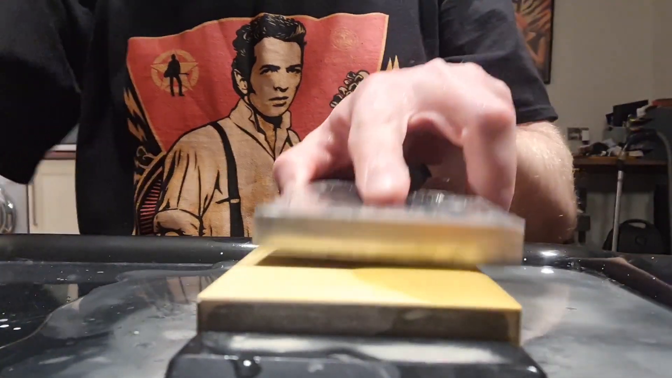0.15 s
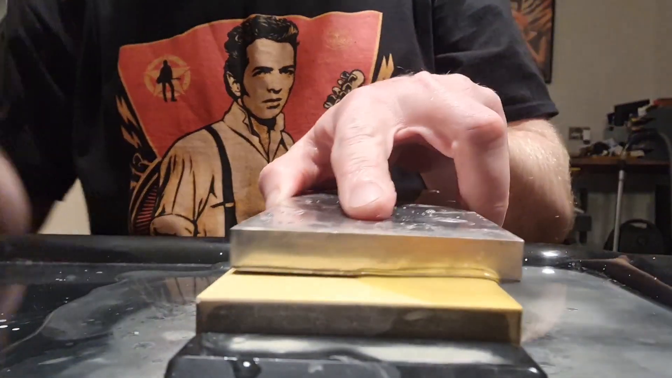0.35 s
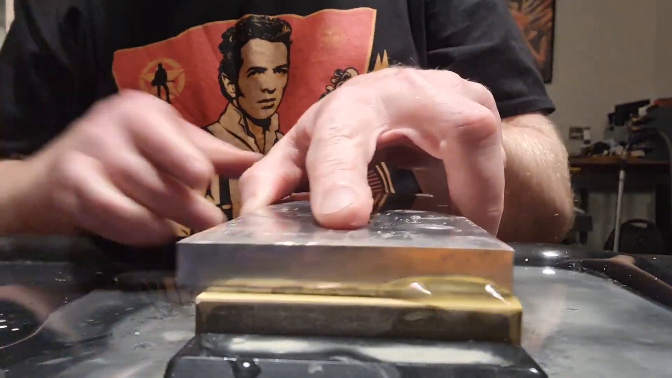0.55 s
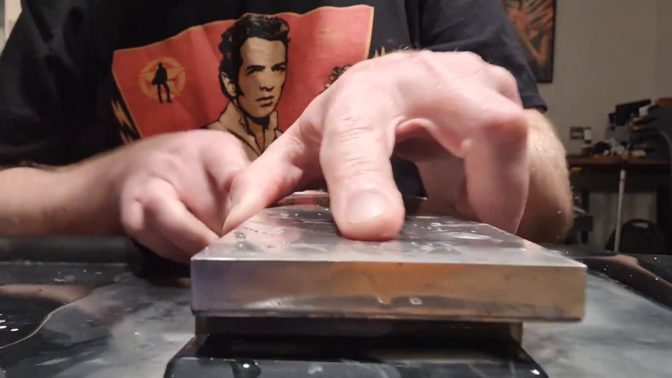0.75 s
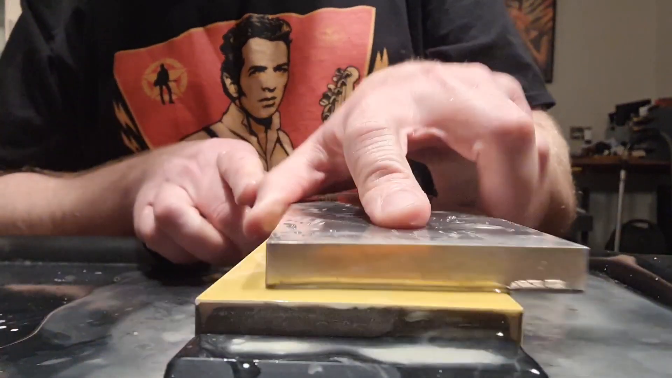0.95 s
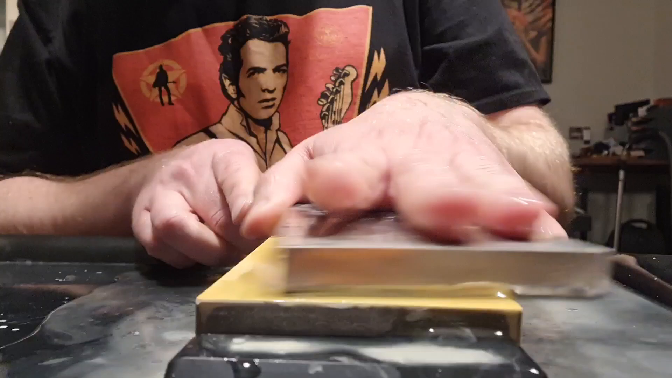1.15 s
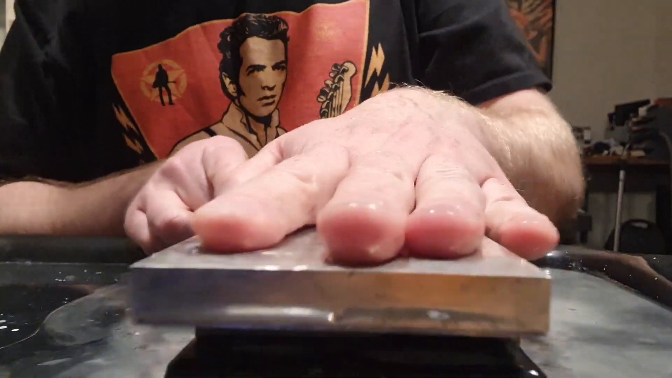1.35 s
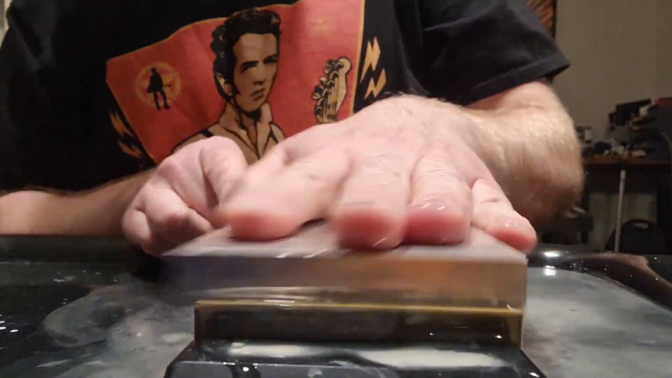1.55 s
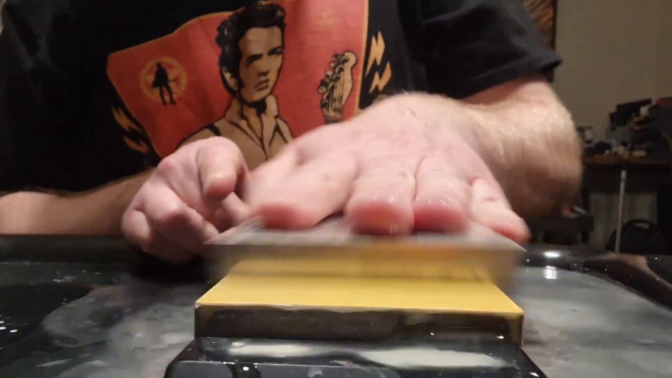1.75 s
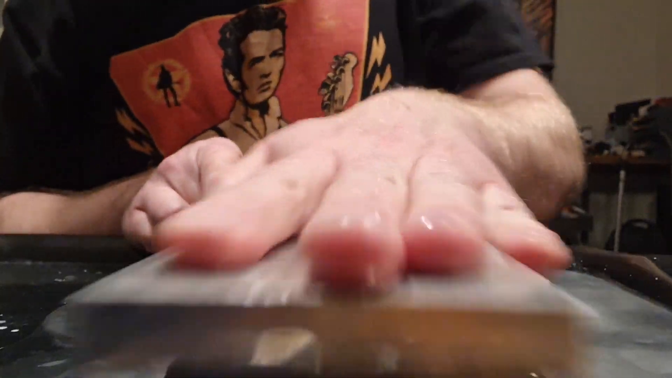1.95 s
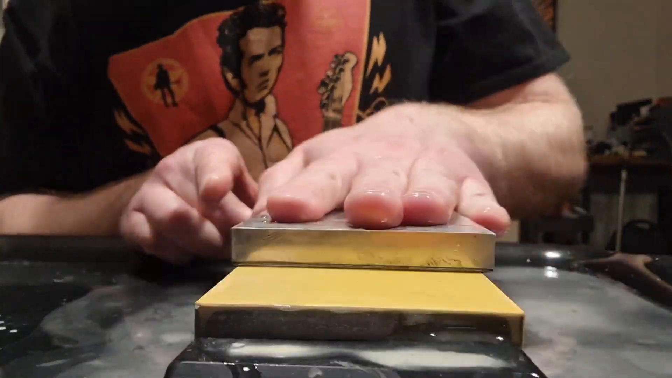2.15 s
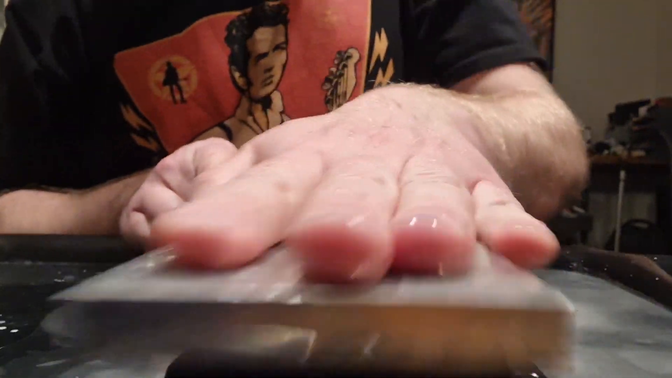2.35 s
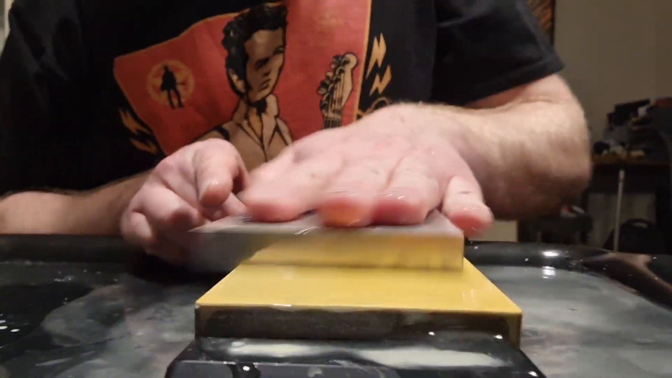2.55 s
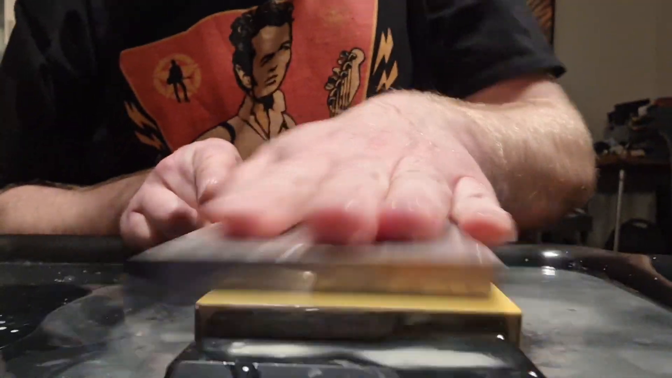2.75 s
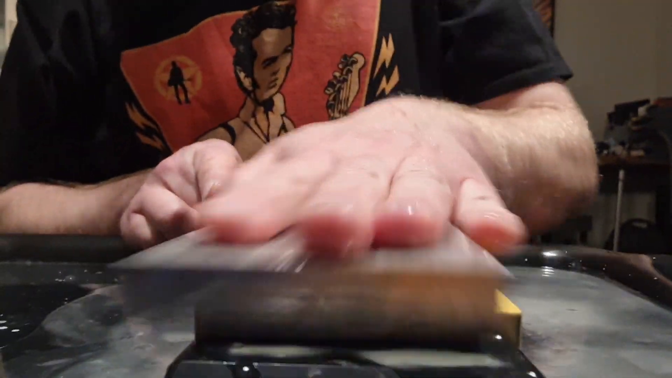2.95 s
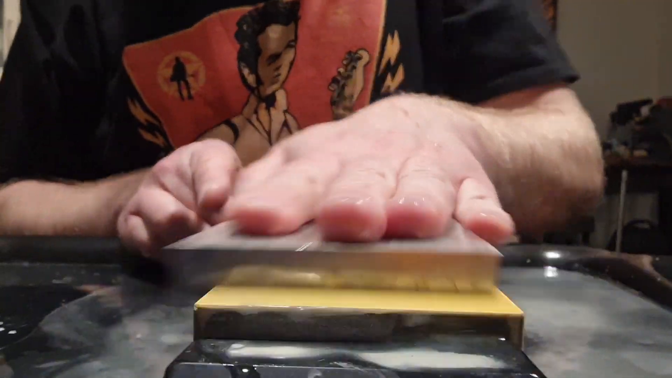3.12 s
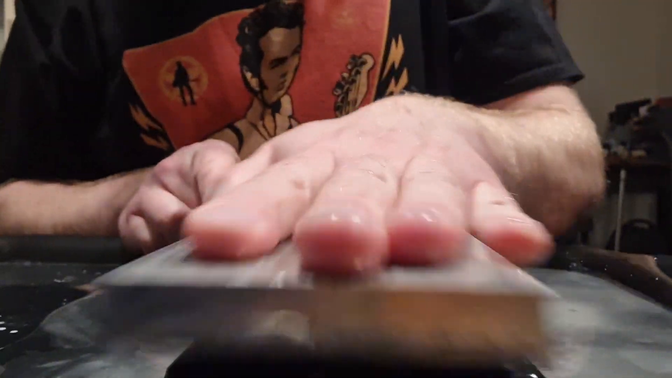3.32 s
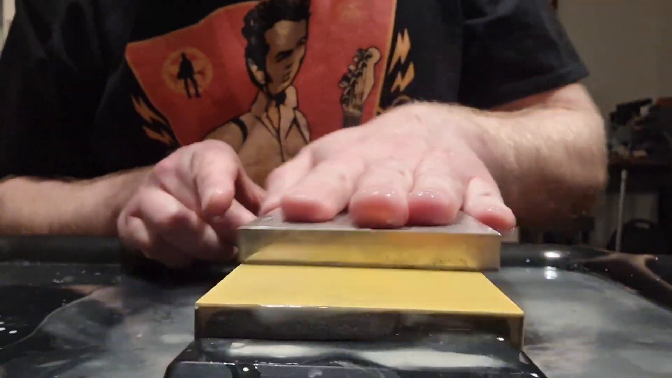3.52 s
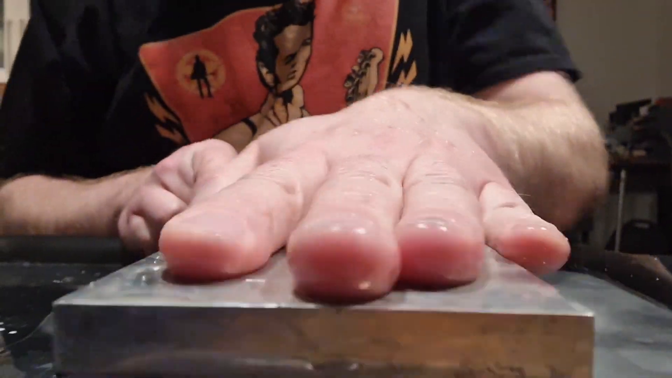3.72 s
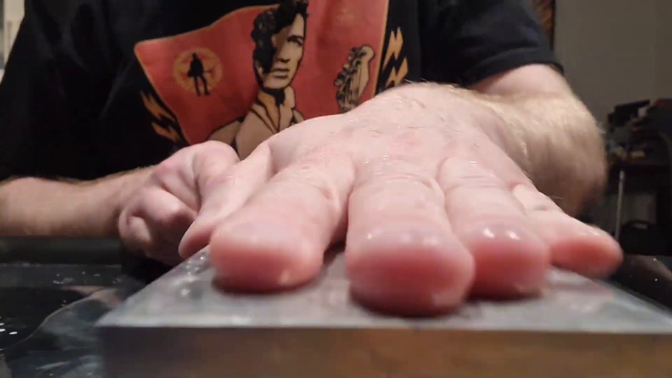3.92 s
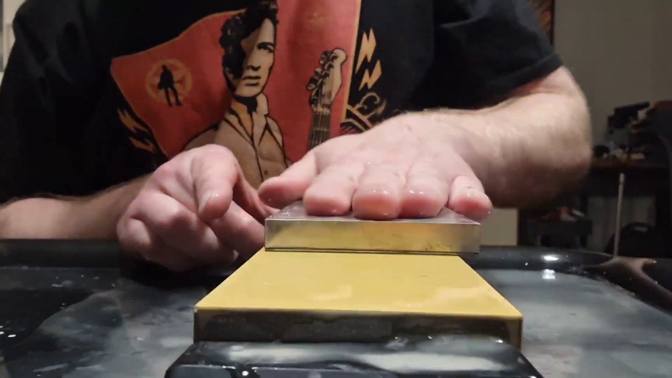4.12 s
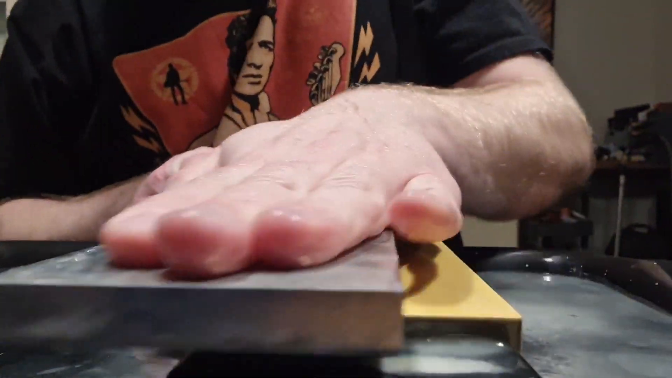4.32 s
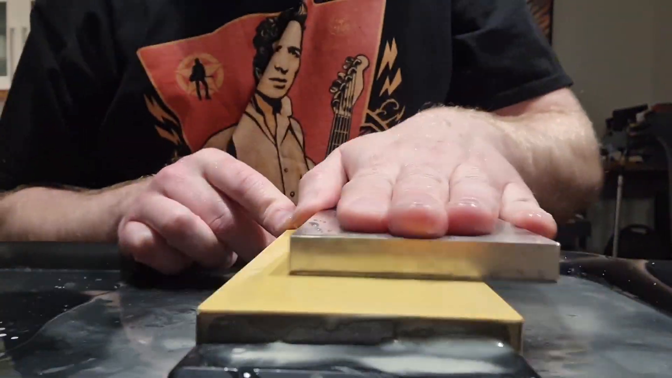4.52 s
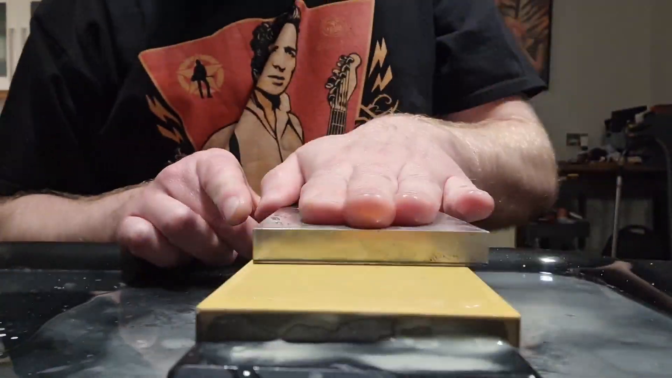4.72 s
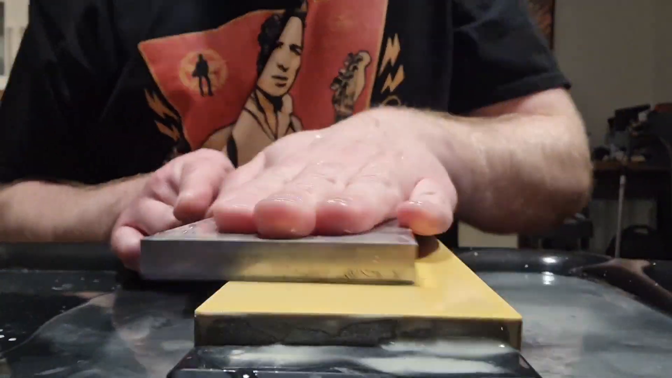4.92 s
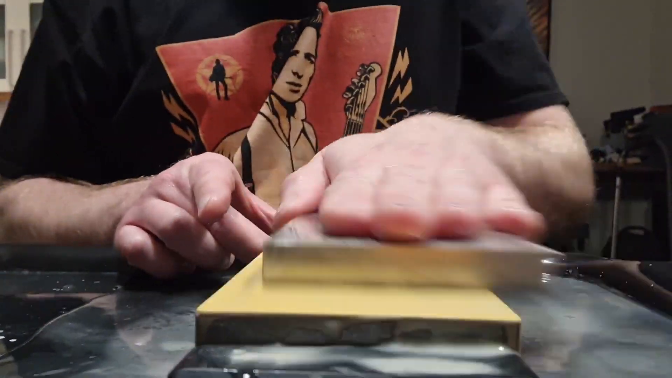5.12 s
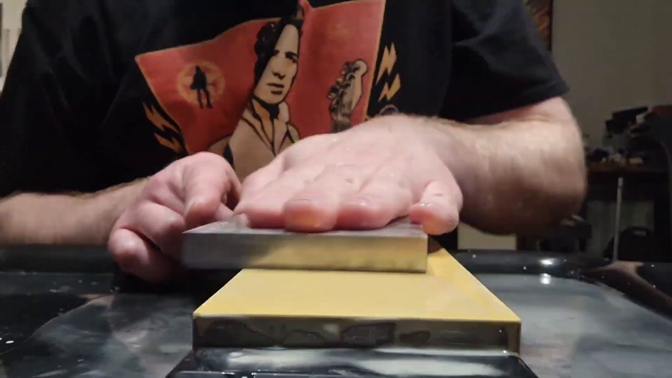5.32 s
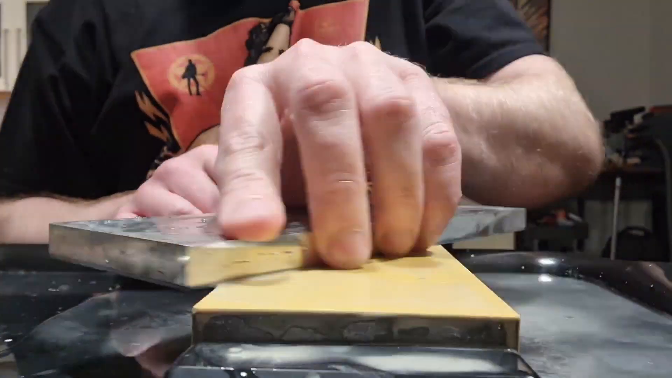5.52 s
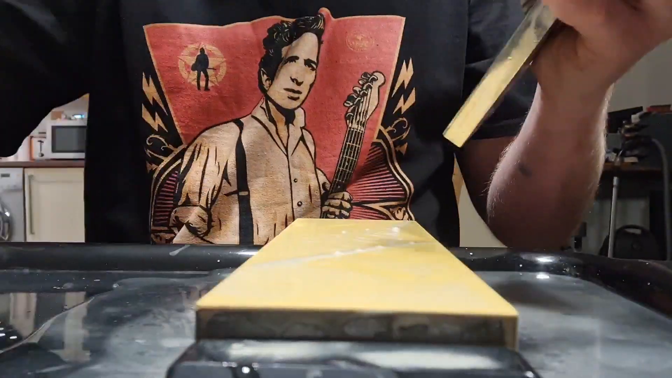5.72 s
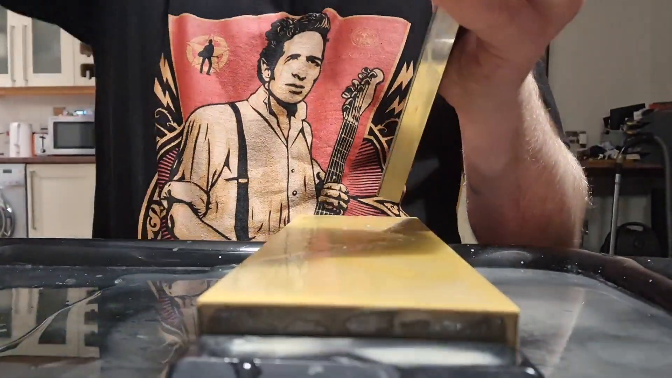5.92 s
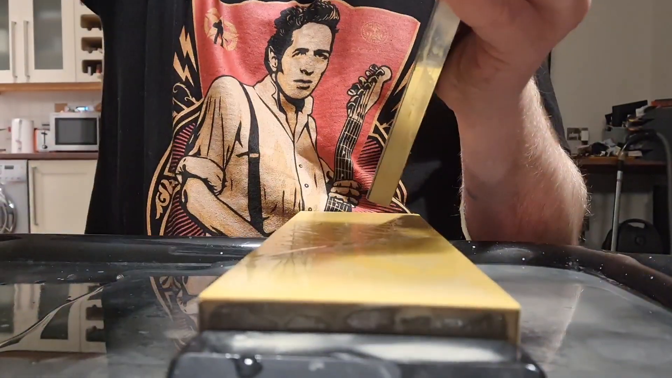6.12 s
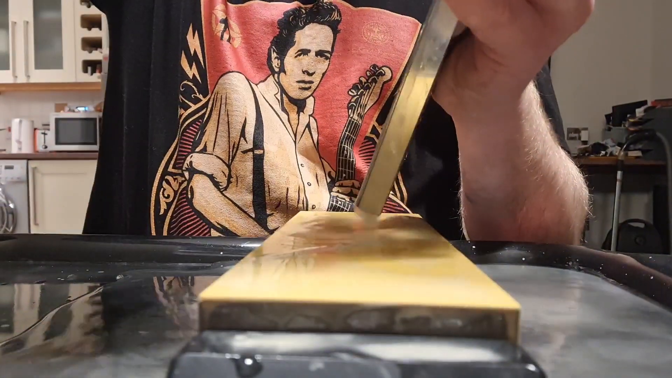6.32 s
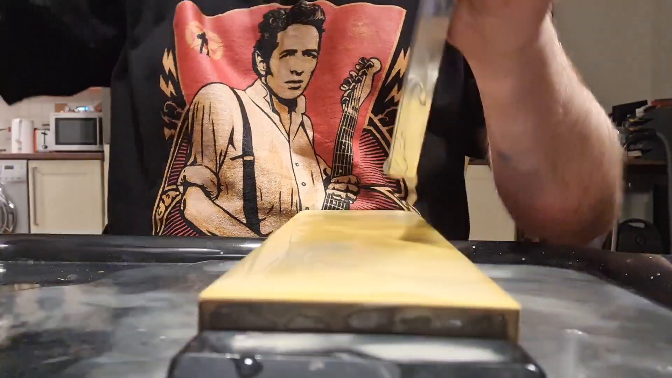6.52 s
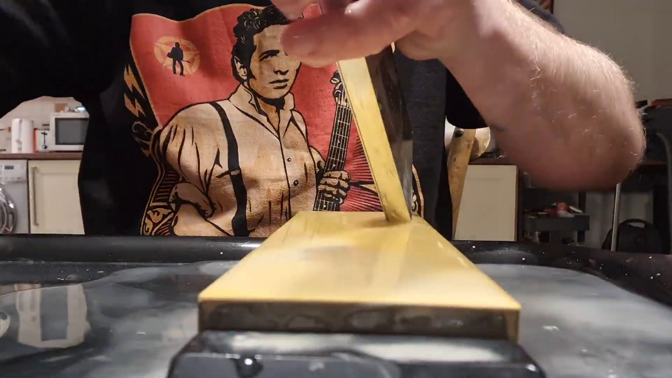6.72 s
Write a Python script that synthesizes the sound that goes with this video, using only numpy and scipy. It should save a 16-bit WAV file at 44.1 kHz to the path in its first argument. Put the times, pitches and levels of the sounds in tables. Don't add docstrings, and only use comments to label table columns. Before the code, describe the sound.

Gritty metal-on-wet-stone strokes build and quicken after a short knock, then stop abruptly, leaving small bumps, watery ticks and quiet hum.

```python
import sys
import numpy as np
from scipy import signal
from scipy.fft import rfft, irfft, next_fast_len
from scipy.io import wavfile

SR = 44100
rng = np.random.default_rng(int(sys.argv[2]) if len(sys.argv) > 2 else 0)


def boost(x):
    u = np.asarray(x, float) / 20
    return 10 ** u


def materialize(psi):
    bounded = np.clip(np.atleast_2d(psi).T, -1, 1)
    quanta = np.round(bounded * 32767).astype(np.int16)
    wavfile.write(sys.argv[1], SR, quanta)


N = 302967
TIME, WIDE = np.arange(N) / SR, next_fast_len(N)
FREQ = np.maximum(np.arange(WIDE // 2 + 1) * SR / WIDE, 1)

TURNS = [1.348, 1.511, 1.662, 1.828, 2.006, 2.175, 2.344, 2.515, 2.689, 2.859, 3.041, 3.213, 3.39, 3.566,
         3.748]
# time in seconds, rasp level in dB.
PRESSURE = [(1.06, -72), (1.12, -62), (1.19, -45.5), (1.28, -44), (1.42, -37.5), (1.62, -35.5), (1.95, -32),
            (2.4, -32), (3.0, -32.5), (3.8, -32.5), (4.1, -32), (4.3, -31.5), (4.6, -36), (4.85, -31.5),
            (5.07, -35), (5.3, -32.5), (5.43, -36), (5.462, -36), (5.482, -96)]
# time in seconds, overhang from -1 (far) to 1 (near).
WANDER = [(3.9, -0.19), (3.93, 0.28), (4.1, -0.31), (4.19, 0.3), (4.375, -0.019), (4.4, 0.14), (4.8, -0.63),
          (4.95, 0.5), (5.1, -0.48), (5.3, -0.18), (5.38, 1), (5.46, -0.75)]
# start in seconds, length in seconds, level in dB,
# change over the slide in dB, tilt in dB per octave.
SLIDES = [(0.197, 0.086, -39.5, -1, -3), (0.286, 0.13, -41.5, -1, 0.5), (0.436, 0.053, -44.5, -5, -2),
          (0.495, 0.063, -49, 2, -0.5), (0.565, 0.12, -50, 0.5, 1), (0.834, 0.13, -63.5, 10.5, 1),
          (0.94, 0.21, -56, -4, -1.5), (5.507, 0.019, -44, 8, 3), (5.556, 0.018, -43, 1, -3.5),
          (5.737, 0.013, -36, -8, 1.5), (6.162, .015, -69, -4, -6), (6.293, .01, -64, -4, 7),
          (6.428, 0.047, -48.5, 1, 0.5), (6.687, 0.013, -69, -4, -9), (6.837, .012, -55.5, -1, -5.5)]
QUICK_S, LIFT_S = WANDER[0][0], PRESSURE[-1][0]
FULL_DB = -32


def rms_one(x):
    return x / np.sqrt(np.mean(x ** 2) + 1e-20)


def in_time(rows):
    s, *columns = np.transpose(rows)
    return [np.interp(TIME, s, c) for c in columns]


def at_hz(points):
    hz, db = np.transpose(points)
    return np.interp(np.log(FREQ), np.log(hz), db)


def drift(rate):
    r = np.exp(-32 * np.pi * rate / SR)
    slow = signal.lfilter([1], [1, -2 * r, r * r], rng.standard_normal(N // 16 + 3002))[3000:]
    return np.interp(np.arange(N) / 16, np.arange(len(slow)), rms_one(slow))


def resonate(x, hz, width_hz):
    r = np.exp(-np.pi * width_hz / SR)
    poles = [1, -2 * r * np.cos(2 * np.pi * hz / SR), r * r]
    return signal.lfilter(np.array([1, 0, -1]) * (1 - r * r) / 2, poles, x)


def add(out, s, db, hz, t60, rise=0., soft_ms=.3):
    start = int(s * SR)
    t = np.arange(min(int(t60 * SR) + 2, N - start)) / SR
    swell = 1 - np.exp(-(1000 * t / soft_ms) ** 2)
    ring = np.sin(2 * np.pi * hz * t * (1 + rise * t / t60))
    out[start:][:len(t)] += swell * boost(db - 60 * t / t60) * ring


def bells(rows, stretch=0.95, flat=2.7):
    out = np.zeros(N)
    for s, db, ms in rows:
        half = ms * stretch / 2000
        near = slice(max(int((s - 4 * half) * SR), 0), int((s + 4 * half) * SR))
        out[near] += db * .5 ** (np.abs(TIME[near] - s) / half) ** flat
    return out


def coloured(db):
    return irfft(rfft(rng.standard_normal(WIDE)) * boost(db), WIDE)[:N]


def grit(per_s, clump_db):
    return (rng.random(N) < per_s / SR) * rng.standard_normal(N) * boost(clump_db * drift(70.4))


def room():
    # frequency in Hz, density in dB per Hz.
    air_colour = [(25, -33), (50, -4.5), (120, -9), (300, -9.5), (500, -22.5), (650, -24), (1400, -44),
                  (2100, -41.5), (3000, -29.5), (6000, -31.5), (10000, -43.5), (15500, -43)]
    # frequency in Hz, width in Hz, level in dB.
    hums = [(331.5, 3.9, -65.5), (474, 20, -62.5)]
    air = boost(-57.5 + 1.0 * drift(14)) * rms_one(coloured(at_hz(air_colour)))
    return air + sum(boost(db) * rms_one(resonate(rng.standard_normal(N), hz, width)) for hz, width, db in hums)


def thud():
    # frequency in Hz, density in dB per Hz.
    blow_colour = [(65, -54), (110, -11.5), (257, -2), (332, -12), (378, -4), (472, -13.5), (499, -13),
                   (547, -8.5), (695, -18.5), (1680, -37), (1810, -35.5), (3270, -40), (9000, -53.5),
                   (11700, -69), (19800, -120)]
    # frequency in Hz, t60 in seconds.
    decay = [(150, 0.61), (600, 0.67), (2000, 0.58), (8000, 0.57)]
    decay_hz, decay_s = np.transpose(decay)
    out = 0
    for hz in 125 * 2.0 ** np.arange(7):
        share = np.clip(1 - np.abs(np.log2(FREQ / hz)), 1e-6, 1)
        t60 = np.interp(np.log(hz), np.log(decay_hz), decay_s)
        out = out + coloured(at_hz(blow_colour) + 10 * np.log10(share)) * boost(-60 * TIME / t60)
    return boost(-23.5) * out / np.std(out[:SR // 20])


def sway():
    # time in seconds, level in dB.
    thrusts = [(0.02, -28.5), (0.25, -33), (0.4, -44.5), (0.548, -42.5), (1.191, -24), (1.4, -36),
               (1.54, -32.5), (1.62, -36), (1.75, -28), (1.87, -20), (2.01, -34), (2.11, -24),
               (2.24, -17.5), (2.448, -18), (2.58, -17.5), (2.71, -27.5), (2.8, -22.5), (2.927, -17.5),
               (3.14, -22), (3.269, -24), (3.5, -22.5), (3.638, -24.5), (3.8, -29), (3.925, -29.5),
               (4.02, -25), (4.1, -33), (4.18, -37), (4.25, -21.5), (4.34, -24), (4.41, -33), (4.47, -21.5),
               (4.7, -26), (4.83, -27), (4.92, -28), (4.99, -23.5), (5.04, -28), (5.2, -31), (5.27, -32),
               (5.32, -35), (5.37, -31), (5.4, -31), (5.57, -41), (5.72, -43), (5.84, -47), (6.85, -39)]
    rise_s, fall_s, shake_db, still_db = 0.023, 0.025, -0.1, -81
    quick = (TIME > QUICK_S) & (TIME < LIFT_S)
    power = boost(2 * still_db) + boost(2 * (in_time(PRESSURE)[0] + shake_db)) * quick
    for s, db in thrusts:
        near = slice(max(int((s - .15) * SR), 0), int((s + .3) * SR))
        late = TIME[near] - s
        rising = (late / rise_s) ** 2 * (late < 0)
        falling = 2 * (np.hypot(1, late / fall_s) - 1) * (late > 0)
        power[near] += boost(2 * db) * np.exp(-rising - falling)
    return np.sqrt(power)


def bench():
    sway_hz = 56.75 * (1 + 0.052 * drift(4.67))
    rock = np.sqrt(2) * np.sin(2 * np.pi * np.cumsum(sway_hz) / SR)
    jolts = coloured(-20 * np.log10(1 + (FREQ / 95) ** 5.0) - 20 * np.log10(1 + (32 / FREQ) ** 9.9))
    hurried = np.interp(TIME, [0, 3.85, 3.95, 5.5], [0.2, 0.25, 0.72, 0.9])
    steady = np.sqrt(1 - np.minimum(hurried, 1) ** 2)
    return sway() * (steady * rock + hurried * rms_one(jolts))


def kicks():
    far_db, near_db, after_s = -23.5, -23, -0.0083
    out = np.zeros(N)
    for k, (s, luck) in enumerate(zip(TURNS[3:], rng.normal(0, 1, len(TURNS)))):
        db = (near_db if k % 2 else far_db) + 1.1 * luck
        add(out, s + after_s, db, 158, t60=0.09, rise=-0.59, soft_ms=9.8)
    return out


def contacts():
    # frequency in Hz, level in dB, t60 in seconds.
    knock = [(456, -32.5, 0.15), (700, -14, 0.019), (930, -13, 0.018), (1430, 5, 0.0038),
             (2000, -14.5, 0.0095), (2960, -14, 0.0062), (4000, -26, 0.0087), (5500, -35, 0.0057),
             (7000, -40, 0.0034)]
    # time in seconds, peak in dB, frequency in Hz, t60 in seconds.
    drops = [(.230, -25, 4470, 0.0059), (0.527, -35, 6900, 0.0055), (.912, -46, 2500, 0.008),
             (.832, -47, 4500, 0.0054), (.712, -48, 5800, .006), (.985, -50, 3500, .006),
             (1.0975, -39, 3500, .003), (5.543, -30, 2200, .005), (5.772, -56, 9500, .004),
             (6.4152, -34, 13000, 0.0016), (6.472, -41, 11500, .005), (.913, -44, 4850, 0.0086),
             (1.16, -42, 5000, .005), (.952, -54, 12800, .003), (0.864, -42.5, 4000, .01),
             (1.0965, -31, 1230, 0.016), (5.571, -34.5, 2000, 0.042), (5.859, -54, 1500, 0.015),
             (6.164, -53, 1700, 0.035), (6.297, -45, 5500, .02), (6.316, -52, 830, 0.038),
             (6.356, -45, 1580, 0.014), (6.4148, -31, 9000, .002), (6.4245, -28, 3920, 0.0093),
             (6.432, -40, 11500, .006), (6.440, -40, 10900, .006), (6.448, -37.5, 3160, 0.034),
             (6.456, -20, 9000, 0.0046), (6.457, -27, 5700, 0.0062), (6.484, -41, 7500, 0.0087),
             (6.502, -35, 1100, 0.016), (6.490, -37, 1080, 0.023)]
    # time in seconds, peak in dB, push in ms, tray rattle in dB.
    bumps = [
        (5.565, -21, 7.5, -39),
        (5.615, -29, 8.6, -22),
        (5.734, -35, 3.1, -10),
        (6.683, -44.5, 5.1, 6),
        (6.691, -32.5, 6.9, -9.5),
        (6.84, -22, 6.1, -22.5),
        (6.850, -15.5, 1.65, -37),
    ]
    # frequency in Hz, level in dB, t60 in seconds.
    tray = [(333, 9, 0.026), (570, -12, 0.087), (830, -3.5, 0.024), (1110, -8, 0.02), (1315, -9.5, 0.041),
            (2900, -24, 0.022)]
    out = np.zeros(N)
    for hz, db, t60 in knock:
        add(out, .1952, db, hz, t60, soft_ms=1.0)
    for (s, db, hz, t60), spread in zip(drops, rng.normal(0, 1, (len(drops), 5))):
        add(out, s, db, hz, t60, rise=0.032, soft_ms=1500 / hz)
        for step in spread:
            splash_hz = min(hz * 2 ** (.3 * step), 13000)
            add(out, s + .002 * abs(step), db - 9, splash_hz, t60 / 2, soft_ms=1000 / hz)
    for (s, db, ms, rattle_db), luck in zip(bumps, rng.normal(0, 1, (len(bumps), len(tray), 2))):
        add(out, s, db + 5.0, 500 / ms, 7.3 * ms / 1000, soft_ms=2.7)
        for (hz, mode_db, t60), (more, later) in zip(tray, luck):
            add(out, s + 0.00282 * abs(later), db + rattle_db + mode_db + 2 * more, hz, t60, soft_ms=0.55)
    return out


def film():
    # time in seconds, level in dB, length in ms.
    sheets = [
        (5.74, -69, 120),
        (6.09, -61, 195),
        (6.53, -58, 284),
        (6.87, -69, 92),
    ]
    # frequency in Hz, density in dB per Hz.
    hiss_colour = [(800, -20), (1800, -12), (2600, -9), (4000, -9.5), (6000, -9.5), (9000, -15.5),
                   (10500, -26), (15000, -62)]
    dry_db = -72
    flow_db = dry_db + bells([(s, db - dry_db, ms) for s, db, ms in sheets], flat=5.0)
    return boost(flow_db + 1.0 * drift(17)) * (TIME > 5.6) * rms_one(coloured(at_hz(hiss_colour)))


def stroking():
    touch_db_per_s, let_go_db_per_s = 2600, 1000
    level_db, tilt_db = np.full(N, -77.0), np.zeros(N)
    for s, length, db, change_db, tilt in SLIDES:
        near = slice(int((s - .04) * SR), int((s + length + .08) * SR))
        late = TIME[near] - s
        away_db = np.maximum(-touch_db_per_s * late, let_go_db_per_s * (late - length))
        own_db = db + change_db * np.clip(late / length, 0, 1) - np.maximum(0, away_db)
        tilt_db[near][own_db > level_db[near]] = tilt
        level_db[near] = np.maximum(level_db[near], own_db)
    return level_db, tilt_db


def slide():
    # frequency in Hz, width in Hz, level in dB.
    loose = [(169, 69, -5.5), (596, 160, -3.5), (1080, 410, -2), (1590, 700, -0.5), (2460, 770, -0.5),
             (3500, 800, 0.5), (4620, 720, 1.5), (6200, 1400, -2), (8770, 1500, -6), (11800, 3500, -18)]
    level_db, tilt_db = stroking()
    grains = grit(5000, clump_db=.9)
    quiet = (TIME < SLIDES[0][0]) | ((TIME > 1.3) & (TIME < 5.46))
    bands = 0
    for k, (hz, width, db) in enumerate(loose):
        band_db = db + tilt_db * np.log2(hz / 3000) + 1.1 * drift(6)
        bands = bands + (-1) ** k * boost(band_db) * rms_one(resonate(grains, hz, width))
    dull = signal.butter(2, 12500, fs=SR, output="sos")
    return boost(level_db - 10) * ~quiet * signal.sosfilt(dull, bands)


def skids():
    # time in seconds, level in dB, length in ms, frequency in Hz.
    spells = [(0.23, -55, 50, 1640), (0.3, -50.5, 50, 1550), (.36, -52.5, 60, 1700),
              (0.31, -49.5, 70, 3200), (.372, -44.5, 45, 3250), (0.23, -56, 60, 3850),
              (0.41, -45.5, 40, 4000), (0.33, -49, 110, 4650), (.36, -48, 30, 2600), (0.53, -60, 52, 1200),
              (0.67, -62, 70, 4300), (.86, -71, 100, 1570), (.965, -65, 68, 1270), (1.18, -57, 140, 1240),
              (1.18, -51, 76, 4600), (5.742, -53, 13, 1650), (5.58, -60, 240, 750), (.62, -61.5, 120, 2260),
              (.36, -53, 110, 3700), (5.72, -70, 440, 1400), (1.97, -46, 97, 350), (1.09, -57, 50, 1220),
              (6.172, -67, 18, 1350), (6.447, -55, 18, 1150)]
    width_hz = 280
    out, noise = np.zeros(N), rng.standard_normal(N)
    for s, db, ms, hz in spells:
        near = slice(int((s - ms / 600) * SR), int((s + ms / 600) * SR))
        swell = .5 ** np.abs(2000 * (TIME[near] - s) / ms) ** 3
        band = resonate(resonate(noise[near], hz, width_hz), hz, width_hz)
        out[near] += boost(db) * swell * rms_one(band)
    return out


def overhang():
    strokes = np.interp(TIME, [1.17, *TURNS, QUICK_S], np.arange(-1, len(TURNS) + 1))
    reach = np.interp(TIME, [TURNS[0], 2.9], [0.4, 1])
    lag_strokes, peaked = .02, 1.5
    swing = 2 * reach * np.abs(np.cos(np.pi * (strokes - lag_strokes) / 2)) ** (2 * peaked) - 1
    long = TIME < QUICK_S
    speed = long * (np.abs(np.sin(np.pi * strokes)) - .7)
    return np.where(long, swing, in_time(WANDER)[0]), speed


def halts():
    # time in seconds, drop in dB, length in ms.
    falters = [(3.899, 22.5, 20.5), (3.939, 12.5, 7.8), (4.001, 6, 13), (4.057, 14, 10.5), (4.1, 5, 7),
               (4.139, 10.5, 17), (4.164, 19, 10.6), (4.223, 9.5, 14), (4.279, 11, 6.4), (4.323, 16, 14),
               (4.393, 11.5, 18), (4.441, 7.5, 7), (4.486, 12.5, 8.3), (4.557, 9, 10), (4.613, 7.5, 22),
               (4.674, 7, 11), (4.717, 10.5, 23), (4.767, 6, 8), (4.799, 9, 10), (4.858, 17, 11),
               (4.882, 9, 28), (4.93, 11.5, 9.2), (4.962, 9.5, 11), (4.999, 11, 15), (5.08, 12.5, 15),
               (5.131, 3, 9.3), (5.184, 14, 11), (5.207, 9, 18), (5.235, 12.5, 13), (5.331, 6, 6.7),
               (5.443, 13, 12)]
    ends = [(15, 17), (14, 23)]
    stops = []
    for k, s in enumerate(TURNS):
        drop_db, ms = ends[k % 2]
        early_ms = 14 * np.exp((TURNS[0] - s) / .3)
        stops.append((s, drop_db, ms + early_ms))
    return stops + falters


def pockets(rasp_db):
    hollows_hz = [3300, 3790, 4100, 4470, 4880, 7500, 8230]
    grains = grit(9000, clump_db=3.5)
    drive_db = rasp_db + .5 * (rasp_db - FULL_DB) - 17.5 + 3.5 * overhang()[0]
    out = 0
    for hz in hollows_hz:
        opening_db = 4.5 * np.clip(drift(5.8), -3, 2)
        out = out + boost(drive_db + opening_db) * rms_one(resonate(grains, hz, 130))
    return out


def plate(rasp_db):
    # frequency in Hz, width in Hz, level in dB.
    modes = [(6645, 20, -4), (12085, 14, -17), (13380, 14, -23)]
    # time in seconds, level in dB, length in ms, frequency in Hz.
    spells = [(.29, -62, 160, 6645), (.39, -64, 40, 6645), (.5, -67, 160, 6645), (.95, -76, 200, 6645),
              (.32, -76.5, 220, 12085), (1.05, -85, 200, 12085), (.6, -81, 160, 13380),
              (.46, -59, 60, 6645), (.553, -50, 21, 6645), (.6, -45.5, 33, 6645), (.655, -54, 43, 6645),
              (.72, -64, 42, 6645), (.887, -66, 25, 6645), (1.0, -58, 33, 6645), (1.08, -61.5, 70, 6645),
              (1.19, -57, 25, 6645), (1.23, -59, 25, 6645), (.48, -80, 50, 12085), (.6, -69, 50, 12085),
              (.72, -71, 90, 12085), (.93, -78, 40, 12085), (1.22, -65, 60, 12085), (1.5, -72, 70, 12085),
              (.3, -77, 100, 13380), (.44, -74, 60, 13380), (.67, -77, 50, 13380), (1.0, -77, 50, 13380),
              (1.14, -72, 80, 13380), (1.47, -66, 45, 13380), (3.275, -44, 40, 6645), (5.06, -46, 30, 6645),
              (5.455, -52, 22, 12085)]
    out = np.zeros(N)
    for s, db, ms, hz in spells:
        near = slice(int((s - ms / 500) * SR), int((s + ms / 500) * SR))
        swell = .5 ** (2000 * (TIME[near] - s) / ms) ** 2
        out[near] += boost(db + 3) * swell * np.sin(2 * np.pi * hz * TIME[near])
    out *= boost(3.5 * drift(55))
    drive_db = rasp_db + np.interp(TIME, [TURNS[0], 1.9], [0, -8])
    for hz, width, db in modes:
        ring = rms_one(resonate(rng.standard_normal(N), hz, width))
        out = out + boost(drive_db + db - 4 + 3.9 * drift(12)) * ring
    return out


def rasp():
    # frequency in Hz, density in dB per Hz.
    grit_colour = [(71, 3.5), (120, -11.5), (188, -11), (368, -12), (460, -14.5), (847, -14.5), (977, -18),
                   (1380, -12), (1800, -19), (2650, -9), (3820, -2.5), (5740, -8.5), (8290, -5),
                   (11000, -6.5), (15600, -21)]
    # frequency in Hz, width in octaves, level in dB.
    fine_bands = [(2120, .15, 0.5), (5780, 0.069, -1.5), (9100, 0.081, -1), (8000, 0.19, 1),
                  (10560, 0.13, 0.5), (2880, 0.0091, 0.5), (3430, 0.014, 1.5), (3920, 0.014, 3),
                  (4200, 0.021, 3.5), (4500, .015, 3.5), (7500, 0.0074, 1), (8060, 0.0051, -3),
                  (10230, .006, 0.5)]
    zones_hz = np.array([900, 2200, 2800, 3400, 4100, 4900, 5500, 6300, 7300, 9200, 12000])
    # offset in dB, share of the pressure swing, dB per unit of overhang,
    # swell at mid-stroke in dB.
    answers = [
        (1.5, 0.45, -1.2, -3.5),
        (-3, 0.58, 2, -3),
        (-2.5, 0.73, 3, -1.5),
        (-1, 0.44, 2.5, 2.5),
        (-0.5, 1.27, 5.5, 2),
        (-0.5, 2.05, .5, 6),
        (1, 1.9, -0.5, 3.5),
    ]
    # time in seconds, surge in dB, length in
    # ms, centre in Hz.
    surges = [(1.22, 3, 120, 4660), (1.29, 8, 68, 6200), (1.3, -2.5, 80, 3500), (1.39, 5.5, 87, 5500),
              (1.63, -5.5, 58, 3500), (1.6, 5.5, 47, 6200), (1.704, 5.5, 16, 6100), (1.97, -5, 46, 8000),
              (3.926, 7.5, 14, 4000), (4.11, 5.5, 31, 4200), (4.19, 4.5, 20, 3430), (4.30, 7.5, 28, 3280),
              (4.365, 9, 33, 3050), (4.69, 8.5, 27, 2530), (4.948, 6.5, 13, 2820), (5.06, 6, 14, 4200),
              (5.155, 7.5, 12, 4500), (5.317, 9.5, 8.2, 5640)]
    # time in seconds, surge in dB, length in ms, centre in Hz.
    flares = [(1.696, 1, 24, 8800), (1.8, 5, 49, 13600), (1.963, 8, 55, 8850), (2.068, 7.5, 19, 6200),
              (2.201, 9, 100, 2000), (2.269, 3.5, 36, 7400), (2.325, 6, 28, 7400), (2.549, 4, 55, 4000),
              (2.707, 2.5, 67, 3700), (3.102, 3.5, 42, 4000), (3.195, 3.5, 14, 1300), (3.227, 3, 71, 4000),
              (3.281, 3.5, 30, 6200), (3.339, 2, 72, 3700), (3.45, 6, 22, 4000), (4.034, 3, 23, 4000),
              (4.043, 4.5, 26, 10500), (4.134, 9, 24, 1300), (4.151, 0, 22, 10500), (4.203, 5, 120, 2920),
              (4.262, 7.5, 32, 3100), (4.334, 15, 19, 2780), (4.709, 6, 62, 1300), (4.858, 5.5, 48, 9600),
              (4.935, 9.5, 36, 2820), (5.092, 5.1, 45, 13600), (5.099, 3.5, 45, 9600),
              (5.163, 5.5, 28, 8100), (5.23, 10, 31, 11400), (5.367, 7, 27, 12400), (5.368, 5, 44, 3100),
              (5.431, 8, 56, 10500)]
    # time in seconds, surge in dB, length in ms.
    rocks = [(1.84, 13.5, 30), (1.93, 6.5, 83), (2.15, 9, 170), (2.51, 6.5, 170), (2.87, 6.5, 180),
             (3.22, 1, 22), (3.4, 6, 200), (3.58, 5, 18)]
    level_db, (place, speed), stops = in_time(PRESSURE)[0], overhang(), halts()
    groups_db = [FULL_DB + db + share * (level_db - FULL_DB) + lean_db * place + swell_db * speed
                 for db, share, lean_db, swell_db in answers]
    bites = [(s + .051, 5.5, 17, 5400) for s in TURNS[2::2]] + surges
    bites += [(s - 0.045, 4, 62, 4000) for s in TURNS[2::2]]
    near = -.5 + 0.96 * place + 0.073 * drift(9.3)
    ring_hz = 4200 * 2 ** (-.14 * near)
    lifted_db = -150 * np.maximum(1.13 - TIME, 0) - 60 * (TIME > LIFT_S)

    colour = rfft(grit(36000, clump_db=.5), WIDE) * boost(at_hz(grit_colour))
    colour = colour * boost(sum(db * .5 ** (np.log2(FREQ / hz) / width) ** 2 for hz, width, db in fine_bands))
    colour = colour / np.linalg.norm(colour[(FREQ > 5500) & (FREQ < 9500)]) * WIDE / np.sqrt(2)
    above = [1] + [1 / (1 + (hz / FREQ) ** 14.0) for hz in zones_hz] + [0]
    centres = np.sqrt(np.r_[300, zones_hz] * np.r_[zones_hz, 15000])
    quick = TIME > 3.91
    judder_db, out = np.where(quick, 1.1, .7) * drift(45), 0
    for low, high, hz in zip(above, above[1:], centres):
        own_db = groups_db[np.searchsorted([2200, 3400, 5500, 6300, 9200, 12000], hz)]
        ring_db = 5 * .5 ** (np.log2(hz / ring_hz) / 0.38) ** 2 - 3 * (2200 < hz < 5500)
        follow = np.interp(np.log(hz), np.log([500, 1400, 2500, 14000]), [.25, .55, .9, 1.15])
        longer = np.interp(np.log(hz), np.log([3000, 8000, 14000]), [.9, 1.0, 1.3])
        surge_db = 0
        for rows, octaves in [(bites, 0.83), (flares, 0.44)]:
            surge_db = surge_db + bells([(s, db * .5 ** (np.log2(hz / centre) / octaves) ** 2, ms)
                                         for s, db, ms, centre in rows])
        patch_db = .9 * drift(22)
        rock_db = bells(rocks, 0.73, flat=1.14) * (hz < 900)
        halt_db = follow * np.where(quick, .8, 1) * bells(stops, longer, flat=3.56)
        zone_db = lifted_db + own_db + ring_db + surge_db + rock_db - halt_db + judder_db + patch_db
        out = out + irfft(colour * (low - high), WIDE)[:N] * boost(zone_db)
    return out, level_db + lifted_db - bells(stops)


def scene():
    rubbing, rasp_db = rasp()
    metal = rubbing + plate(rasp_db) + slide() + skids() + pockets(rasp_db)
    return (metal + film() + contacts() + kicks() + bench() + thud() + room())[None]


def band_limit(x):
    return signal.sosfilt(signal.butter(12, 15730, fs=SR, output="sos"), x)


def record(dry):
    # time in seconds, depth in dB, length in ms.
    gap = [
        (3.897, 29, 8.7),
    ]
    return band_limit(dry * boost(-bells(gap, flat=6.0)))


dry = scene()
out = record(dry)
materialize(out)
```